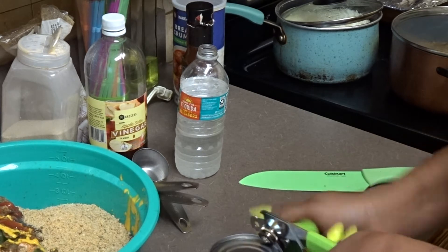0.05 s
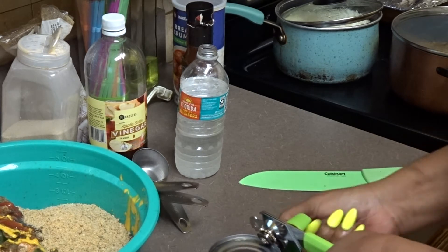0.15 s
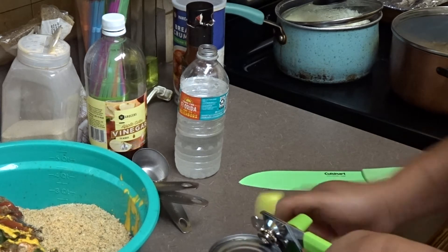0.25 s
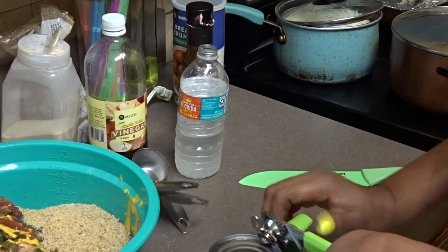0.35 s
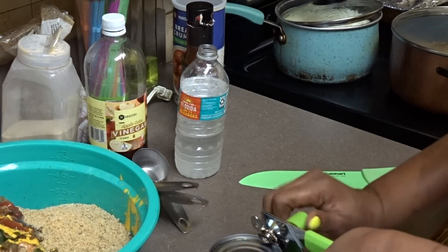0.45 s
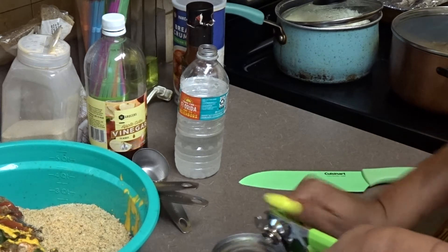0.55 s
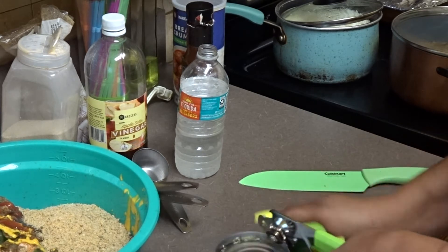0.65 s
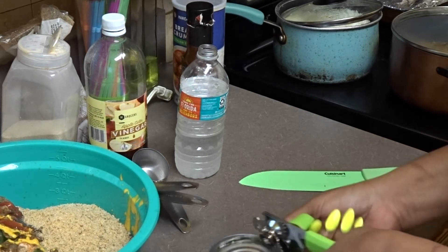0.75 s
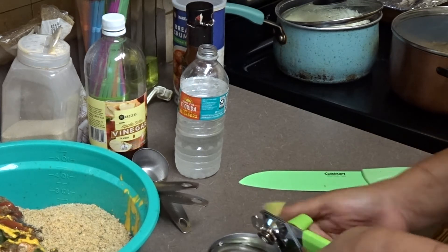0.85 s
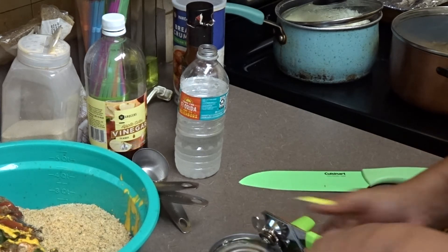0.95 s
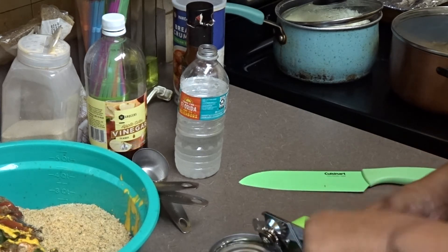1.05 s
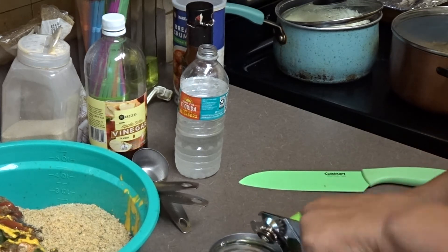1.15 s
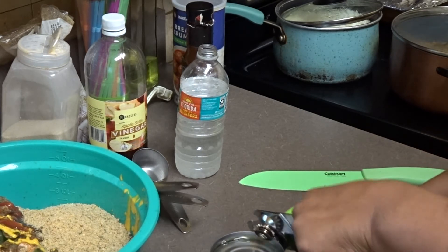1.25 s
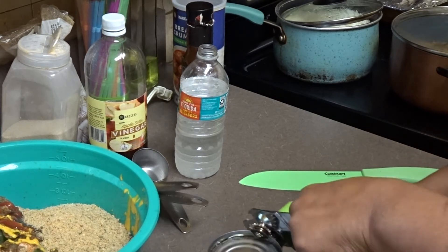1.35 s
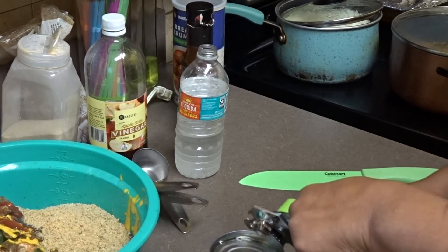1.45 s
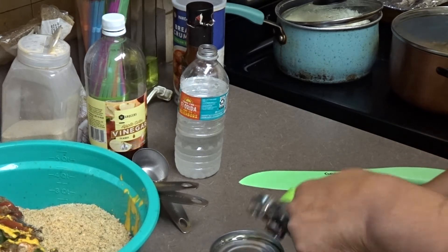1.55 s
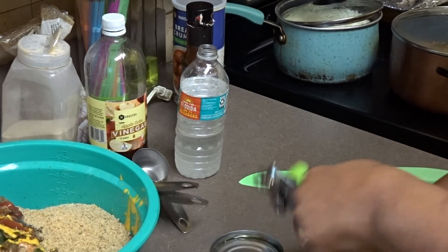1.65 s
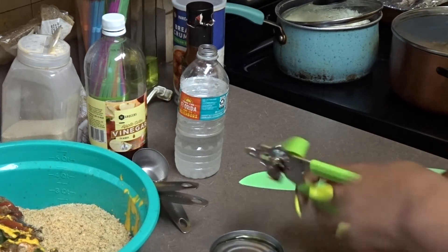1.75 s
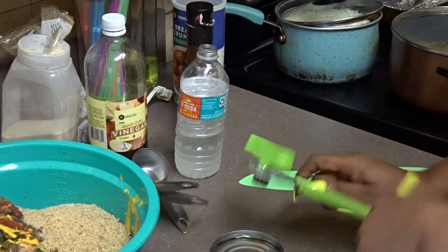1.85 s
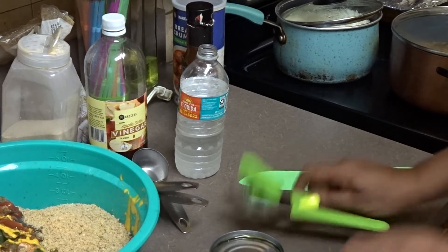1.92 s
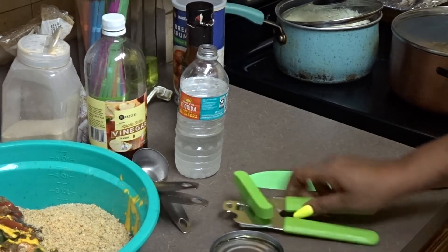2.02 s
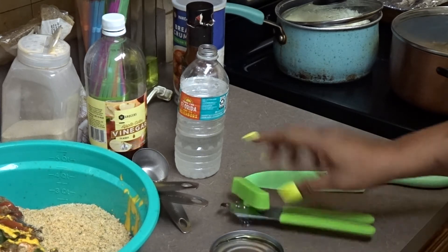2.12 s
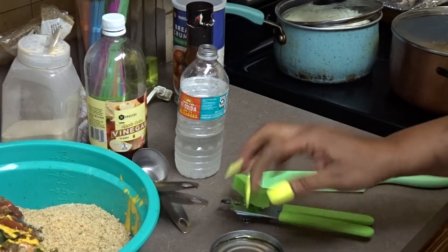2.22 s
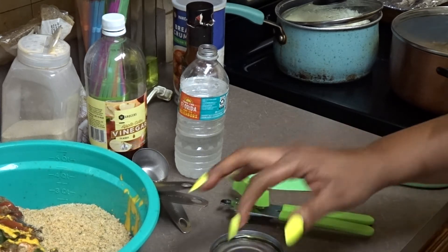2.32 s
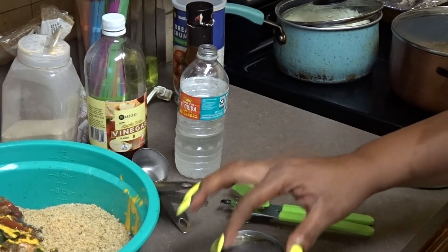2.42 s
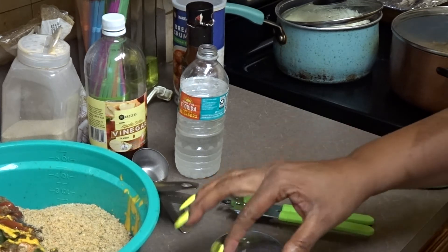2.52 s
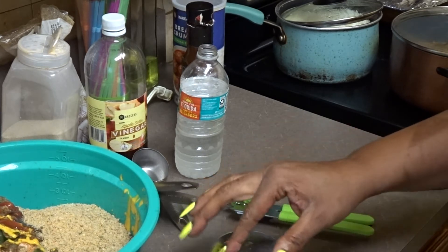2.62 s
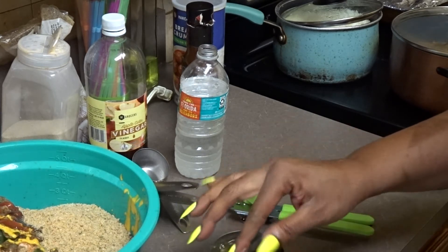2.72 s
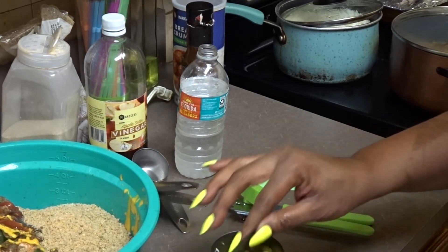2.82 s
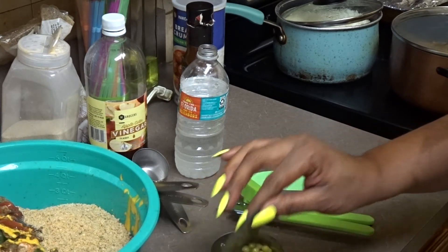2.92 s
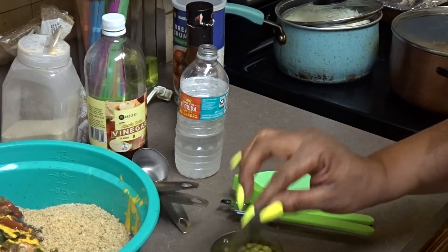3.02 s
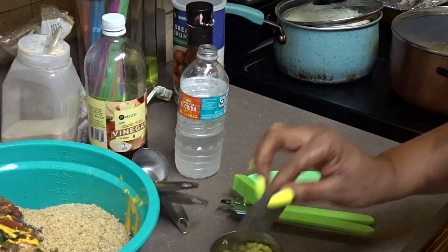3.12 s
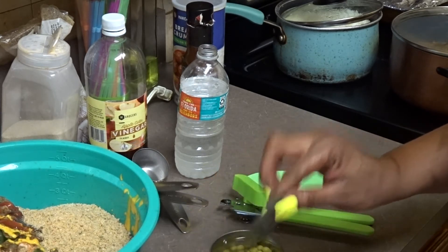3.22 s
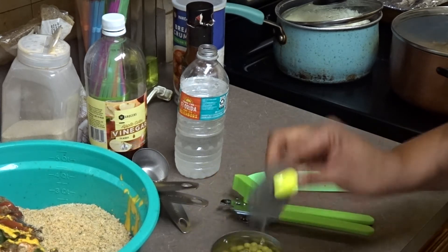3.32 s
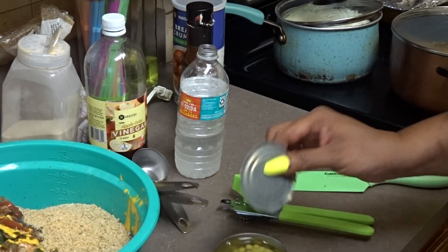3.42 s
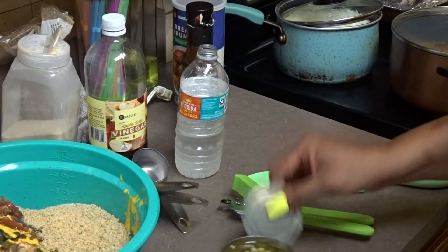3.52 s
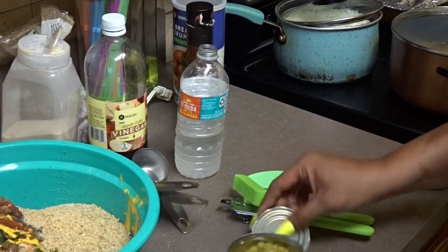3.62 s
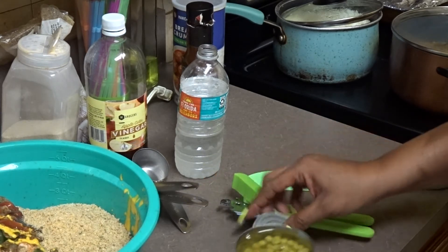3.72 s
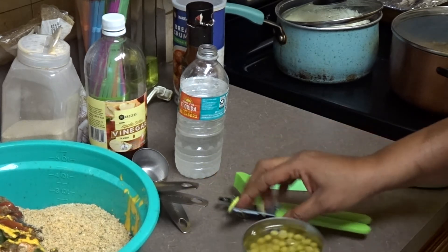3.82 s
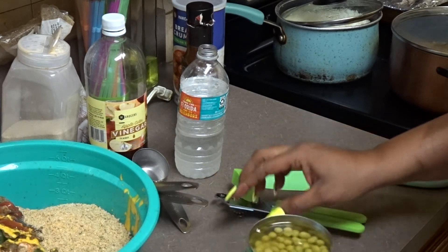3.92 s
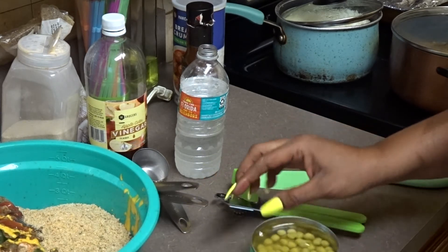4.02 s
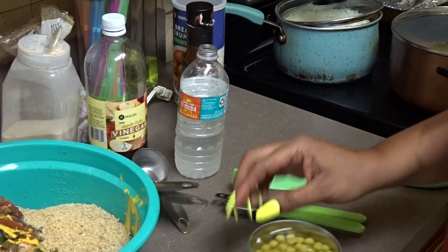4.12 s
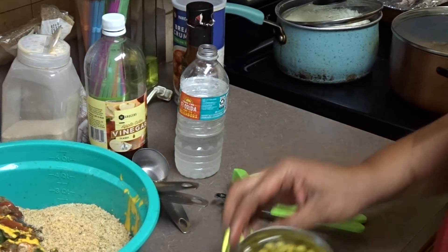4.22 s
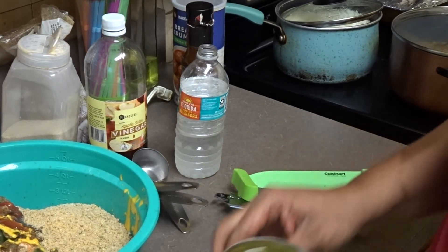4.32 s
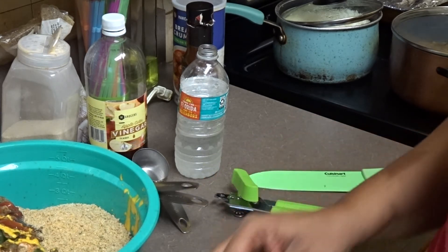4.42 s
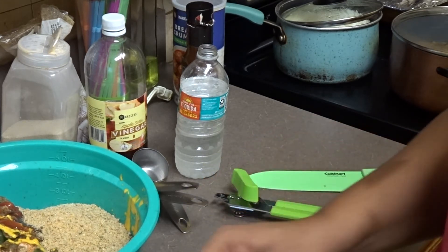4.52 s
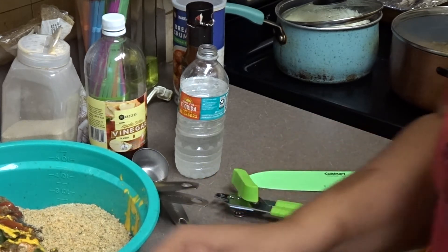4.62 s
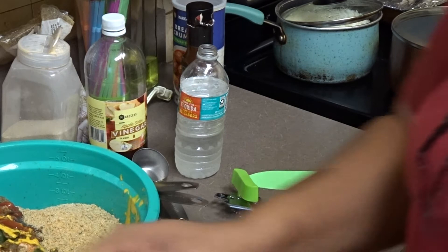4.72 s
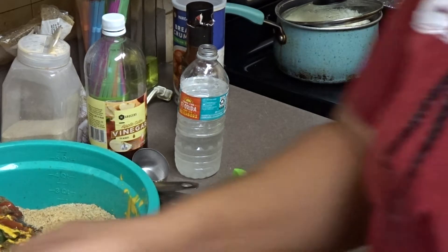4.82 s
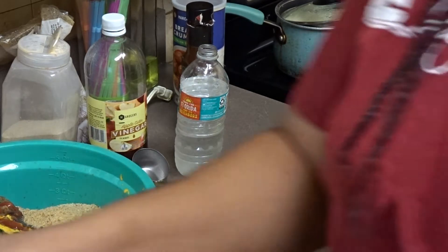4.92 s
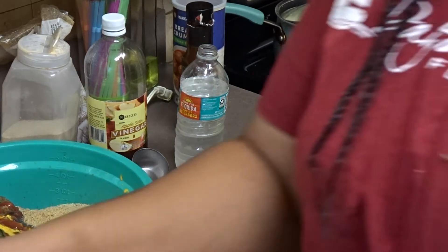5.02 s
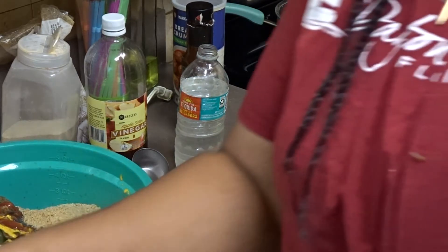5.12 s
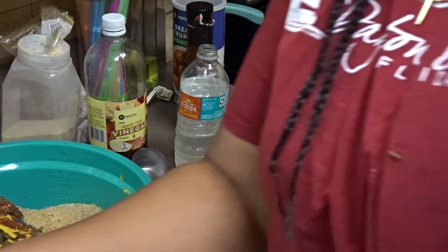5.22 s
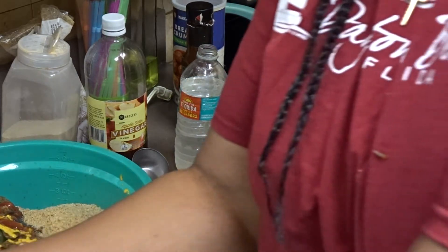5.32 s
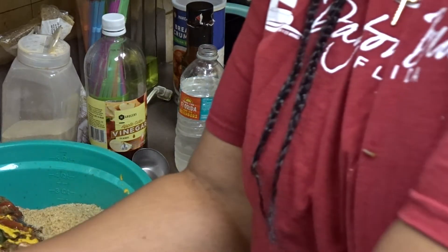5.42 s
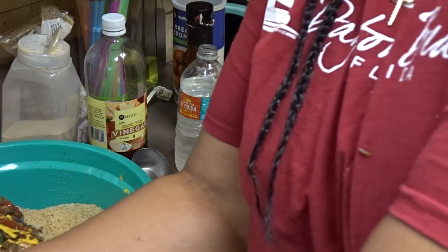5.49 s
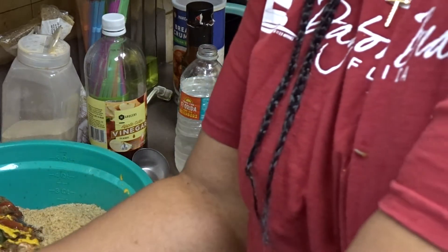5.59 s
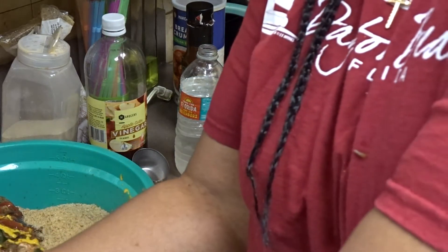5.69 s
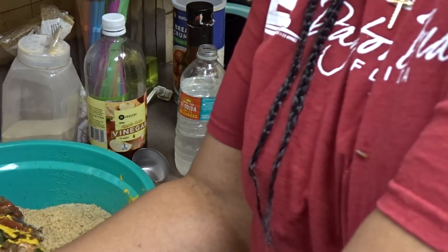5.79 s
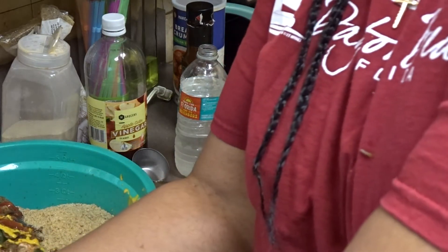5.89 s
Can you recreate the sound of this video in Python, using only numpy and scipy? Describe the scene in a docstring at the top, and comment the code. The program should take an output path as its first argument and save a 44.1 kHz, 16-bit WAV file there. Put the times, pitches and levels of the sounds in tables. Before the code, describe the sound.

Close stereo microphones in a small home kitchen catch steel ticks, a crunchy cluster of cracks and can knocks, then sparse thumps. The opener lands in a rapid metallic clatter. Quiet nail taps lead to dull lid pops and a ringing rim rattle. Near-quiet follows with faint skin and metal slides, a short splat, and finally small drips and bubbles over a faint hum.

```python
"""A hand-cranked opener grinds, ticks and snaps through a can's rim in a small, hard-walled kitchen.
The can knocks on the counter, the opener is put down with a clatter, fingernails tap the lid, and it pops
and rattles: each blow is a chattering contact force filtered by a broad body and by ringing modes.
Fingers and metal slide as swells of tiny slips; a hand lightly taps the can, liquid splats down, then
droplets and rising bubbles trickle into the sink. Filtered noise gives steady air and a faint hum."""
import sys
import numpy as np
from scipy import signal
from scipy.fft import rfft, irfft
from scipy.io import wavfile
from scipy.ndimage import uniform_filter1d

SR = 44100
rng = np.random.default_rng(int(sys.argv[2]) if len(sys.argv) > 2 else 0)


def master_out(mix):
    """Clip the mix to full scale and print it as 16-bit PCM to the path in sys.argv[1]."""
    frames = np.transpose(np.atleast_2d(mix))
    ceiling = np.clip(frames, -1, 1)
    pcm = np.round(ceiling * 32767).astype(np.int16)
    wavfile.write(sys.argv[1], SR, pcm)


N = 262395  # samples in the scene
SIZE = 16384  # samples in one event or impulse response
T = np.arange(SIZE) / SR
HZ = np.maximum(np.fft.rfftfreq(SIZE, 1 / SR), 1)


def undb(db):
    """Decibel law: the amplitude gain of a level in dB."""
    return 10 ** (np.asarray(db) / 20)


def unit(x):
    """Energy normalisation: scale to a sum of squares of one."""
    return x / np.sqrt(np.sum(x ** 2) + 1e-18)


def along(points, hz=HZ):
    """Logarithmic frequency scale: interpolate (Hz, value) points along it."""
    f, value = np.transpose(points)
    return np.interp(np.log(hz), np.log(f), value)


def response(db):
    """Minimum phase: the causal impulse response, by folded cepstrum, with this gain in dB at each HZ."""
    cepstrum = irfft(np.log(undb(db)))
    cepstrum[1:SIZE // 2] *= 2
    cepstrum[SIZE // 2 + 1:] = 0
    return irfft(np.exp(rfft(cepstrum)))


def through(x, impulse):
    """Linear filtering: convolve x with an impulse response, keeping its length."""
    return signal.fftconvolve(x, impulse)[:len(x)]


def hump(hz, q):
    """Resonance: gain in dB of one damped oscillator about its centre."""
    return -10 * np.log10(1 + (q * (HZ / hz - hz / HZ)) ** 2)


def fade(t60):
    """Exponential damping: a decay of 60 dB in t60 seconds."""
    return np.exp(-np.log(1000) * T / max(t60, 1e-4))


def ringing(modes, uneven_db=2.5, detune=0.0098):
    """Modal superposition: each new point of contact slightly shifts the strength and pitch of the modes."""
    out = 0
    draws = rng.standard_normal((len(modes), 3))
    for (hz, db, t60), (bend, luck, turn) in zip(modes, draws):
        tone = np.sin(2 * np.pi * (hz * (1 + detune * bend) * T + turn))
        swell = 1 - np.exp(-hz * T)  # builds up within about a cycle
        out = out + undb(db + uneven_db * luck) * unit(tone * swell * fade(t60))
    return out


def add(track, s, x, db):
    """Superposition: mix in one event, its level being its energy spread over 1/40 s."""
    start = max(int(s * SR), 0)
    x = (unit(x) * undb(db) * np.sqrt(SR / 40))[:N - start]
    track[start:start + len(x)] += x


def grains(size, rate, spread_db):
    """Shot noise: random tiny impacts, many weak and a few strong."""
    chance = rng.random(size)
    sign = rng.choice([-1, 1], size)
    strength = rng.exponential(size=size)
    return (chance < rate / SR) * sign * undb(spread_db * np.minimum(strength, 4))


def even(x, size):
    """Spectral whitening: spread a burst's energy evenly over frequency, so that it favours no pitch."""
    spectrum = rfft(x)
    power = uniform_filter1d(abs(spectrum) ** 2, size=size)
    flat = irfft(spectrum / np.sqrt(power + 1e-12))
    return unit(flat * (T < T[SIZE // 2]))


def contact(chatter_s, chatter_db=-1):
    """Impact: one sharp push, then a dying chatter; a long chatter outweighs the push."""
    chatter_s = max(chatter_s, 1e-4)
    chatter = unit(grains(SIZE, 3000, 6.2) * np.exp(-T / chatter_s))
    force = chatter * undb(chatter_db) * np.sqrt(chatter_s / 0.0043)
    force[0] += 1
    return even(even(force, size=11), size=11)


# Reverberation time of the room: frequency_hz, t60_s
ROOM_T60 = [(120, 0.76), (400, 0.31), (1500, 0.33), (4000, 0.32), (9000, 0.31), (16000, 0.29)]
# Stereo width of the reflected sound: frequency_hz, side_minus_mid_db
ROOM_SIDE = [(80, -26.5), (170, -42.5), (350, -20.5), (700, -12.5), (1400, -7), (2800, -6), (5000, -0.5),
             (12000, -0.5)]


def kitchen(x, direct_db=-7, build_s=0.0091, early_db=0, early_s=0.012):
    """Reverberation: direct sound, early and late reflections; close microphones share bass more than treble."""
    edges = np.r_[0, np.geomspace(100, 14000, num=13), SR]
    spectra = rfft(rng.standard_normal((2, SIZE)))
    late = 0
    for lo, hi, t60 in zip(edges, edges[1:], along(ROOM_T60, edges[1:])):
        band = irfft(spectra * ((HZ >= lo) & (HZ < hi)))
        late = late + band * fade(t60) / np.sqrt(t60)
    late = late * (1 - np.exp(-T / build_s))
    # counter and cupboards close by answer first
    early = rng.standard_normal((2, SIZE)) * np.exp(-T / early_s)
    mid, side = (even(far, size=31) + undb(early_db) * even(near, size=15)
                 for far, near in zip(late, early))
    mid[0] += undb(direct_db)
    side = through(unit(side), response(along(ROOM_SIDE)))
    return through(x, unit(mid)) + np.array([[1], [-1]]) * through(x, side)


def blows(table, body, modes, treble_hz=1500, bass_hz=550):
    """Source and filter: hard contacts excite the treble, heavy ones the bass; the modes ring on."""
    track = np.zeros(N)
    treble = np.log2(1 + (HZ / treble_hz) ** 2) / 2  # octaves above the corner
    bass = 1 / (1 + (HZ / bass_hz) ** 2)
    for s, db, hardness, weight_db, ring_db, chatter_s in table:
        force = through(contact(chatter_s), response(hardness * treble))
        knock = through(force, response(along(body) + weight_db * bass))
        ring = through(force, ringing(modes))
        add(track, s, unit(knock) + undb(ring_db) * unit(ring), db)
    return kitchen(track, direct_db=-7)


# Spectral shape of the air noise: frequency_hz, relative_level_db
AIR_SPECTRUM = [(15, -54.5), (25, -15), (206, -8), (236, -13.5), (263, -7.5), (591, -12.5), (754, -7.5),
                (911, -14), (1160, -18), (1400, -19.5), (4030, -22.5), (5140, -24.5), (7510, -31.5),
                (16000, -39.5)]
AIR_DB, HUM_HZ, HUM_DB = -60, 760, -82.5


def hush(hum_q=60):
    """Filtered noise: steady air sound, and an appliance's narrow whirr alike in both ears."""
    mid, side, whirr = rng.standard_normal((3, N))
    air = mid + np.array([[1], [-1]]) * through(side, response(along(ROOM_SIDE)))
    colour = unit(response(along(AIR_SPECTRUM)))
    hum = through(whirr, unit(response(hump(HUM_HZ, hum_q))))
    return undb(AIR_DB) * np.array([through(ear, colour) for ear in air]) + undb(HUM_DB) * hum


FIRM_DB, FIRM_CHATTER_S = -26, .005  # a firm knock and its chatter
DRAG_S_PER_DB = .0017  # chatter added per dB below a firm knock
CAN_RING_DB, CAN_DAMP_DB_PER_S = -3, 600  # undamped ring, and its loss per second of chatter
# The opener's crank grinds (first two rows), then the can knocks on the counter:
# start_s, level_db, hardness_db_per_octave, weight_db (bass)
CRANK_AND_CAN = [(.004, -30, 1, 1), (.036, -27, 2, 11), (.405, -45.5, -20, 13), (.468, -38.5, -19, 5),
                 (.575, -18.5, 0, -5), (.593, -15, -10, -28), (.614, -22, -.5, -15), (.677, -17.5, -2.5, 0),
                 (.805, -40, 1, -16), (.885, -37.5, 3, 20), (.911, -23, -4, -1.5), (1.172, -35, .5, 10),
                 (1.181, -27.5, -4.5, 4), (1.36, -40.5, -1.5, 1), (1.436, -37, -2.5, 13),
                 (2.724, -44, 2.5, 1.5), (3.429, -47, 1, 6)]
# Broad response of the can: frequency_hz, gain_db
CAN_BODY = [(29, -59), (50, -16), (91, -18), (167, -7), (408, -6), (520, -1.5), (765, -7.5), (863, -6),
            (1740, -16.5), (2320, -14.5), (3760, -23), (7390, -37), (14900, -53), (16000, -66)]
# Mean modes of the can: pitch_hz, level_db, t60_s
CAN_MODES = [(128, -14, 0.12), (173.6, -1, 0.16), (238.3, -3, 0.097), (261, -0.5, 0.057),
             (395, -10.5, 0.11), (524, -10, 0.06), (610, -14, .04), (770, -6, 0.039)]


def crank_and_can():
    """Contact damping: firm contacts are crisp, gentle ones drag, and dragging damps the ring."""
    rows = []
    for s, db, hardness, weight_db in CRANK_AND_CAN:
        chatter_s = FIRM_CHATTER_S + DRAG_S_PER_DB * max(FIRM_DB - db, 0)
        ring_db = CAN_RING_DB - CAN_DAMP_DB_PER_S * chatter_s
        rows.append((s, db, hardness, weight_db, ring_db, chatter_s))
    return blows(rows, CAN_BODY, CAN_MODES)


# Fingers and metal slide: middle_s, length_s, level_db (before a rise with length), centre_hz,
# top_db (gain approached above 8500 Hz)
RUBS = [(.038, 0.05, -33, 2670, -7.5), (.244, 0.092, -48, 3230, -1), (1.096, .067, -49, 3900, -13),
        (2.678, 0.092, -50, 3600, -21), (2.845, .033, -58.5, 4800, -19), (3.387, .17, -46, 840, -13),
        (4.342, 0.27, -50.5, 2440, -13), (4.489, .14, -46, 3250, -3), (4.536, .08, -34, 2200, -1),
        (4.584, .097, -40.5, 1880, -4), (5.003, 0.37, -57.5, 964, 15)]


def rubs(slips_per_s=2000, spread_db=2.5):
    """Stick-slip friction: a swell of tiny slips in one broad band; soft skin takes away the top."""
    track = np.zeros(N)
    top = 1 / (1 + (8500 / HZ) ** 6)
    for middle_s, length, db, hz, top_db in RUBS:
        swell = np.sin(np.pi * np.minimum(T / length, 1)) ** 2
        band = response(1.4 * hump(hz, 1.1) + top_db * top)
        scrape = through(grains(SIZE, slips_per_s, spread_db) * swell, band)
        add(track, middle_s - length / 2, scrape, db + 10 * np.log10(1 + length / 0.2))
    return kitchen(track)


FULL_RING_DB, FULL_CHATTER_S = -10, .004  # a full snap is a ragged crack
LIGHT_RING_DB, LIGHT_CHATTER_S = 1, .0006  # a light tick is clean and rings
# Steel ticks and snaps, the opener on the rim, later small metal ticks: start_s, level_db, favoured_hz
STEEL_TICKS = [(.159, -51, 3340), (.344, -31, 3450), (.485, -22, 2500), (0.5584, -15.5, 2300),
               (.879, -53.5, 6300), (1.329, -43, 4100), (2.429, -47.5, 3850), (3.511, -54.5, 3320)]
# Broad response of the steel: frequency_hz, gain_db
STEEL_BODY = [(100, -13), (500, 2), (1400, -6.5), (2400, -0.5), (4000, -1), (6500, -9.5), (10000, -15),
              (16000, -22)]
# Mean modes of the steel, before one region is favoured: pitch_hz, level_db, t60_s
STEEL_MODES = [(1464, 5.5, 0.11), (2410, 0, 0.065), (2564, -5, 0.023), (2760, -10, 0.1), (2970, 0.5, 0.047),
               (3234, 0, 0.028), (3380, -12, .06), (3800, -2.5, .05), (4120, -10.5, 0.1), (5250, -6, 0.047),
               (7860, -23, .03)]


def steel_ticks(crack_q=6, ring_q=3):
    """Selective modal excitation: the opener on the rim, later small metal ticks, each favour some modes."""
    track = np.zeros(N)
    full_db = max(db for _, db, _ in STEEL_TICKS)
    for s, db, hz in STEEL_TICKS:
        force = undb(db - full_db) ** 2  # 1 for the loudest snap
        ring_db = LIGHT_RING_DB + force * (FULL_RING_DB - LIGHT_RING_DB)
        chatter_s = max(force * FULL_CHATTER_S, LIGHT_CHATTER_S)
        crack = unit(response(along(STEEL_BODY) + hump(hz, crack_q) / 2))
        tone = unit(through(ringing(STEEL_MODES), response(2 * hump(hz, ring_q))))
        add(track, s, through(contact(chatter_s), crack + undb(ring_db) * tone), db)
    return kitchen(track, direct_db=-5.0, early_db=-1.0)


LANDING_HARDNESS, LANDING_RING_DB = 3.9, 6  # dB per octave and dB, at the first contact
OPENER_CHATTER_S, OPENER_SETTLE_S = .0034, .3
HARDNESS_LOSS, RING_LOSS_DB = 12, 16  # dB per octave and dB, lost by the settling time
# The opener is put down: start_s, level_db, weight_db (bass)
OPENER_CLATTER = [(1.952, -37.5, -2), (1.964, -13.8, 16), (1.982, -18.5, 4), (2.001, -18, 8),
                  (2.025, -16, -4), (2.093, -17.5, -17.5), (2.121, -16, -3), (2.140, -25, -14),
                  (2.163, -18.5, -18), (2.245, -25.5, -5)]
# Broad response of the opener: frequency_hz, gain_db
OPENER_BODY = [(29, -51), (50, -12), (101, -23.5), (234, -1), (450, -4.5), (507, 8), (601, -6.5), (711, -8),
               (1180, -5), (2750, -9.5), (8540, -31.5), (11100, -34), (16000, -47)]
# Mean modes of the opener: pitch_hz, level_db, t60_s
OPENER_MODES = [(534, 3.5, 0.07), (603, -8, 0.011), (714, 9, 0.029), (733, 1, 0.19), (851, 4, 0.042),
                (1010, 0, .08), (1456, -12, 0.093), (1840, -10, 0.21), (2310, -51, 0.07), (11030, -31, .05)]


def opener_clatter():
    """Repeated impact: the opener lands and tumbles; as it settles, contacts soften and ring less."""
    rows = []
    landing_s = OPENER_CLATTER[0][0]
    for s, db, weight_db in OPENER_CLATTER:
        settled = (s - landing_s) / OPENER_SETTLE_S
        hardness = LANDING_HARDNESS - HARDNESS_LOSS * settled ** 2
        ring_db = LANDING_RING_DB - RING_LOSS_DB * settled ** .5
        rows.append((s, db, hardness, weight_db, ring_db, OPENER_CHATTER_S))
    return blows(rows, OPENER_BODY, OPENER_MODES)


DULL_RING_DB, DULL_CHATTER_S = -9.5, .0035  # fingernail taps and dull pops of the lid
BRIGHT_WEIGHT_DB, BRIGHT_RING_DB, BRIGHT_CHATTER_S = -2.5, 2, 0.0071  # bright strikes of its rim
TICK_RING_LOSS = 1.1  # dB of ring lost per dB per octave of positive hardness
# Fingernails tap the can's lid (first two rows), then the lid flexes and pops:
# start_s, level_db, hardness_db_per_octave, weight_db (bass)
LID_TAPS_AND_POPS = [(2.376, -42, 2.5, -10), (2.47, -49, 1, 9), (3.038, -29, 2.5, 15),
                     (3.046, -31.5, -5, 0), (3.083, -40.5, 3.5, 2), (3.210, -20.5, 1, -6),
                     (3.253, -36.5, 5.5, -30), (3.618, -24, 0.5, -6.5), (3.792, -19.5, -5, -1),
                     (3.815, -21, -13, 7)]
# Bright strikes of the lid's rim, overlapping the pops in time: start_s, level_db, hardness_db_per_octave
LID_RATTLE = [(3.617, -35.5, 15), (3.767, -34, -1), (3.784, -28, -4), (3.815, -18.5, -4.5),
              (3.823, -14.3, -3), (3.873, -21, -6), (3.903, -16, .5), (3.915, -24.5, -4), (3.957, -27, -13)]
# Broad response of the dull taps and pops: frequency_hz, gain_db
DULL_LID_BODY = [(35, -73.5), (60, -14.5), (139, -34), (172, -6.5), (323, -6), (503, 2.5), (651, -6),
                 (862, 3.5), (1310, -11), (1470, -4.5), (2840, -14), (3760, -17), (11500, -40),
                 (16000, -51.5)]
# Broad response of the bright strikes: frequency_hz, gain_db
BRIGHT_LID_BODY = [(80, -35), (240, -26), (330, -19.5), (520, -15), (1050, -13), (1550, -9), (2200, -4.5),
                   (3000, -2.5), (3700, -13.5), (5200, -11.5), (8600, -19.5), (16000, -20.5)]
# Mean modes of the lid: pitch_hz, level_db, t60_s
LID_MODES = [(2080, -6.5, .08), (2306, -11.5, 0.059), (2457, -0.5, 0.062), (2713, 6.5, 0.036),
             (2780, -1.5, 0.084), (2936, 1.5, .025), (3250, 1, 0.083), (3360, -8.5, 0.062), (5450, -15, .1),
             (6570, -14.5, .15), (7330, -18.5, 0.037), (11270, -22.5, .05)]


def lid_blows():
    """Modal excitation: taps and dull pops hardly ring; bright rim strikes ring out unless just ticked."""
    dull = [(s, db, hardness, weight_db, DULL_RING_DB, DULL_CHATTER_S)
            for s, db, hardness, weight_db in LID_TAPS_AND_POPS]
    bright = []
    for s, db, hardness in LID_RATTLE:
        ring_db = BRIGHT_RING_DB - TICK_RING_LOSS * max(hardness, 0)
        bright.append((s, db, hardness, BRIGHT_WEIGHT_DB, ring_db, BRIGHT_CHATTER_S))
    return blows(dull, DULL_LID_BODY, LID_MODES) + blows(bright, BRIGHT_LID_BODY, LID_MODES)


SPLAT_WEIGHT_DB = -1.5
BIG_SPLAT_DB, SPLAT_RING_DB, SPATTER_S = -17, -16, 0.01  # a big splat: its level, ring and chatter
PLOP_PER_DB, SPATTER_GROWTH = .8, 0.42  # dB of ring per dB below it; power law of chatter with amplitude
# A light tap as a hand takes the can (first two rows), then liquid splats:
# start_s, level_db, hardness_db_per_octave
TAP_AND_SPLATS = [(4.149, -41, -2.5), (4.158, -36.5, 1), (4.284, -44, 2), (4.714, -28, 4),
                  (4.720, -19, 2.5), (5.670, -53.5, 7), (5.719, -49.5, 13), (5.790, -42.5, 12)]
# Broad response to the tap and splats: frequency_hz, gain_db
SPLAT_BODY = [(35, -50), (60, -15), (146, -28), (233, -14), (553, -6), (593, -1.5), (715, -6), (1010, 0.5),
              (1090, -3), (1380, 1), (2250, -8), (3940, -13), (16000, -47)]
# Mean modes, very short: pitch_hz, level_db, t60_s
SPLAT_MODES = [(1150, -3, .003), (1650, 0, .003), (2250, -1, .003)]


def tap_and_splats():
    """Size scaling of impact: the tap and small drops are short, big splats spatter longer and ring less."""
    rows = []
    for s, db, hardness in TAP_AND_SPLATS:
        ring_db = SPLAT_RING_DB + PLOP_PER_DB * (BIG_SPLAT_DB - db)
        chatter_s = SPATTER_S * undb(db - BIG_SPLAT_DB) ** SPATTER_GROWTH
        rows.append((s, db, hardness, SPLAT_WEIGHT_DB, ring_db, chatter_s))
    return blows(rows, SPLAT_BODY, SPLAT_MODES)


SMALL_BUBBLE_HZ, SMALL_BUBBLE_OCTAVES = 3300, 1  # middle starting pitch and its range
SMALL_BUBBLE_DB = -6  # against the flow
# Strength of the pour, before its overall trim: time_s, level_db
FLOW = [(5.62, -76), (5.634, -64), (5.734, -49.5), (5.78, -51), (5.796, -44), (5.826, -44), (5.898, -33.5),
        (5.95, -48)]


def small_bubbles(count=14):
    """Random bubble entrainment: rows (s, Hz, dB) at random times, each as loud as the flow allows."""
    times, flow_db = np.transpose(FLOW)
    when, size = rng.random((count, 2)).T
    starts = times[0] + when * (times[-1] - times[0])
    pitches = SMALL_BUBBLE_HZ * 2 ** (SMALL_BUBBLE_OCTAVES * (size - .5))
    return [(s, hz, np.interp(s, times, flow_db) + SMALL_BUBBLE_DB)
            for s, hz in zip(starts, pitches) if s < N / SR]


POUR_DB, BUBBLE_T60_S = -2, .034  # trim of the patter; decay of every bubble
# Spectral shape of the patter: frequency_hz, relative_level_db
SPLASH = [(88, -58), (150, -13), (193, -12), (504, -34), (675, -7.5), (1140, -19.5), (1310, -11.5),
          (2060, -24.5), (2550, -4.5), (6140, -9), (16000, -30.5)]
# Large drops and bubbles: start_s, pitch_hz (at the start), level_db
BUBBLES = [(5.614, 654, -47.5), (5.643, 666, -45), (5.670, 800, -53), (5.799, 1430, -48), (5.83, 1310, -51),
           (5.860, 1320, -43), (5.882, 730, -42.5), (5.916, 890, -41.5)]


def pour(drops_per_s=1800, spread_db=3.5, glide=0.027):
    """Bubble resonance: droplets patter in the sink; trapped bubbles ring and rise in pitch."""
    flow = undb(POUR_DB + np.interp(np.arange(N) / SR, *np.transpose(FLOW), left=-120))
    patter = through(grains(N, drops_per_s, spread_db), response(along(SPLASH)))
    track = np.sqrt(N) * unit(patter) * flow
    for s, hz, db in BUBBLES + small_bubbles():
        pitch = hz * (1 + glide * np.minimum(T / BUBBLE_T60_S, 1))
        phase = 2 * np.pi * np.cumsum(pitch) / SR
        add(track, s, np.sin(phase) * fade(BUBBLE_T60_S), db)
    return kitchen(track, direct_db=-6.0)


def scene():
    """Superposition of sources: all layers add, each struck, rubbed or poured one with its own reflections."""
    solids = steel_ticks() + opener_clatter() + crank_and_can() + lid_blows() + rubs()
    return solids + tap_and_splats() + pour() + hush()


LOW_CUT_HZ, TOP_HZ = 63, 16200
# Balance of the two microphones: frequency_hz, left_minus_right_db
LEFT_SHADE = [(300, 0.5), (3500, -0.6), (8000, -1.5), (14000, -4)]


def record(dry):
    """Band limiting: the left microphone gets less treble than the right; rumble and the very top are cut."""
    shaded = [through(x, response(sign * along(LEFT_SHADE) / 2)) for x, sign in zip(dry, (1, -1))]
    lean = signal.sosfilt(signal.butter(2, LOW_CUT_HZ, "high", fs=SR, output="sos"), shaded)
    return signal.sosfilt(signal.ellip(10, .1, 80, TOP_HZ, fs=SR, output="sos"), lean)


dry = scene()
out = record(dry)
master_out(out)
```